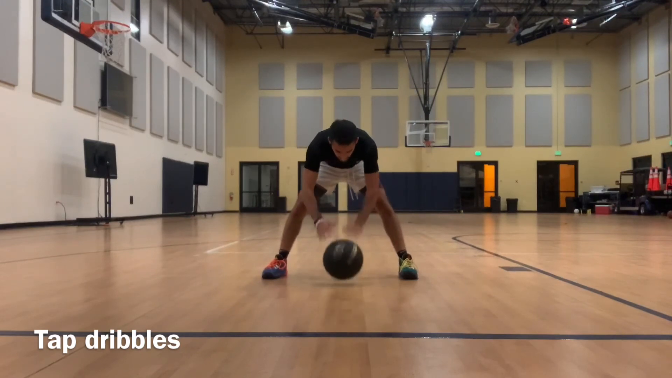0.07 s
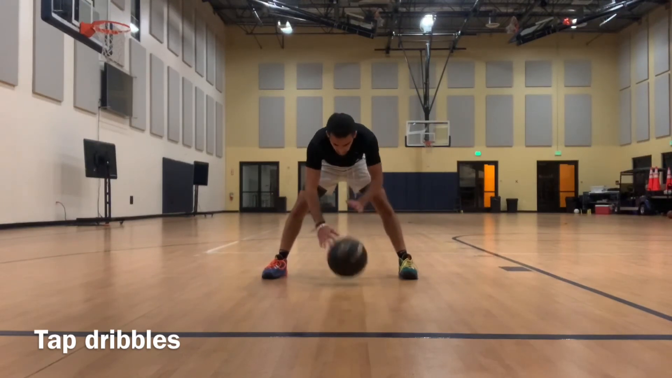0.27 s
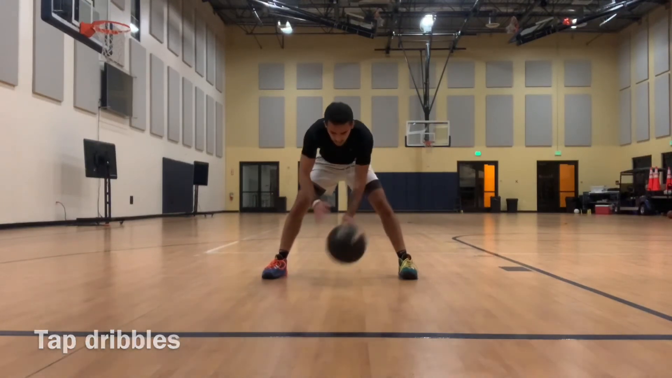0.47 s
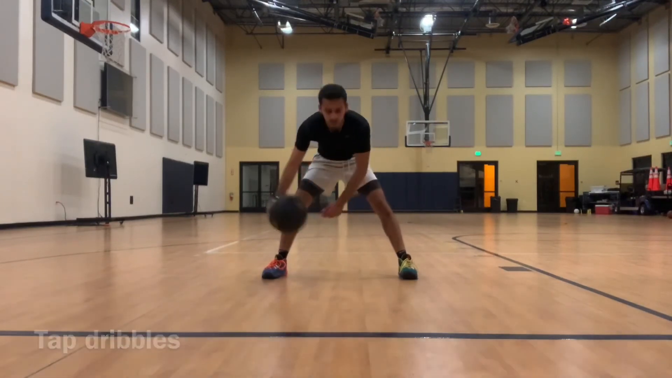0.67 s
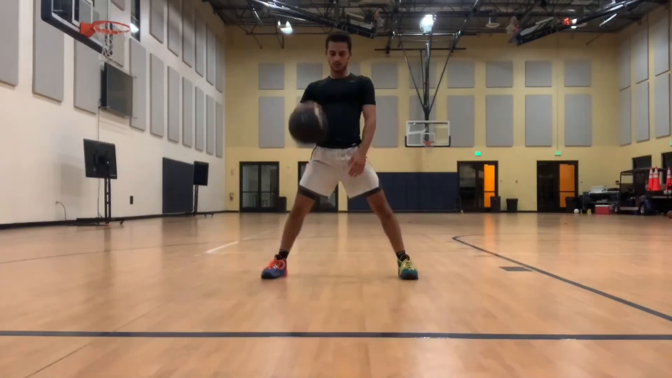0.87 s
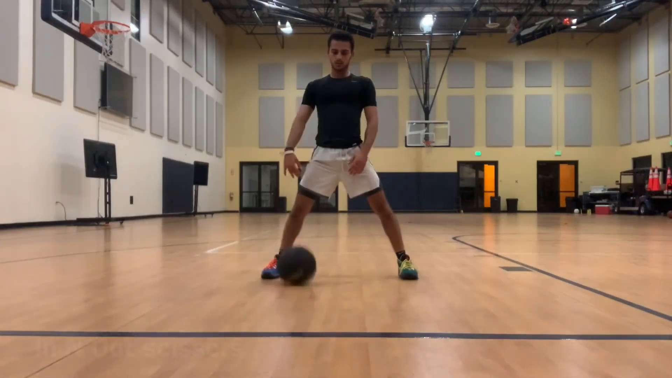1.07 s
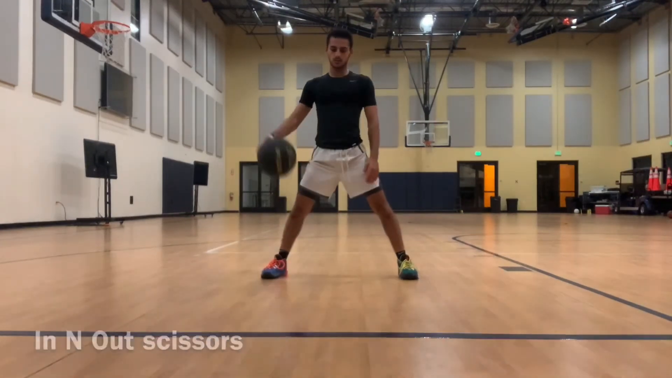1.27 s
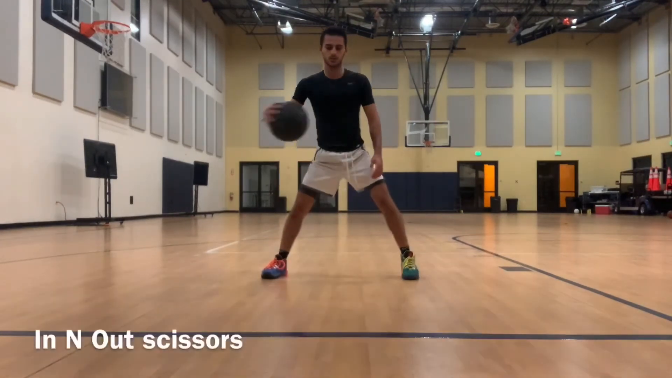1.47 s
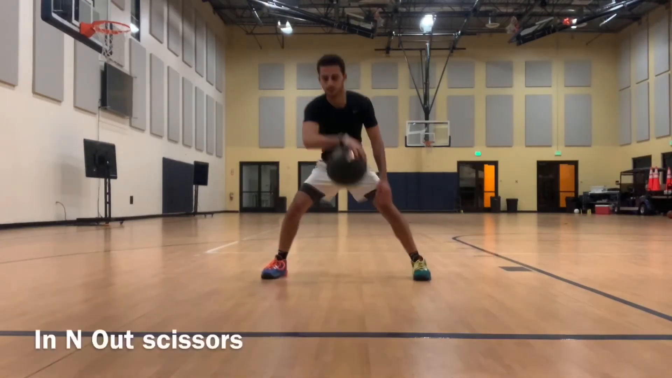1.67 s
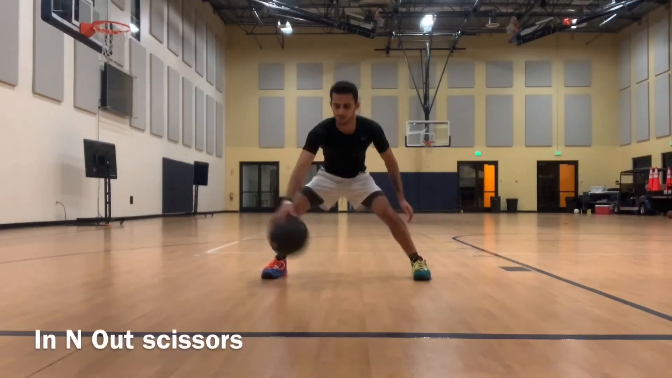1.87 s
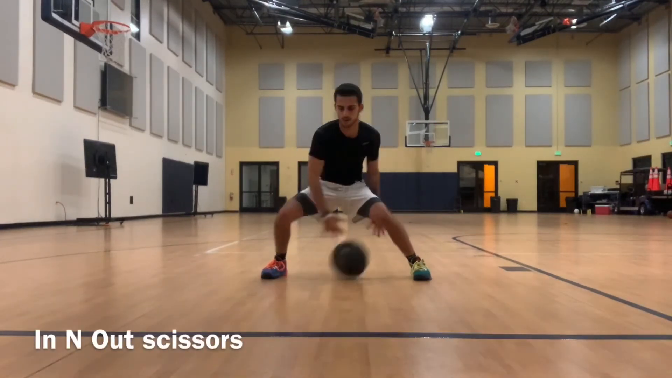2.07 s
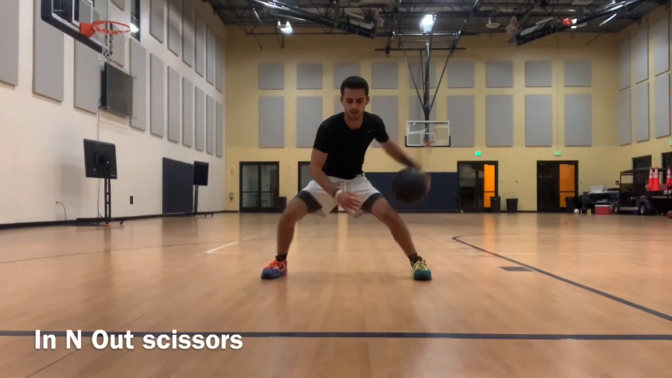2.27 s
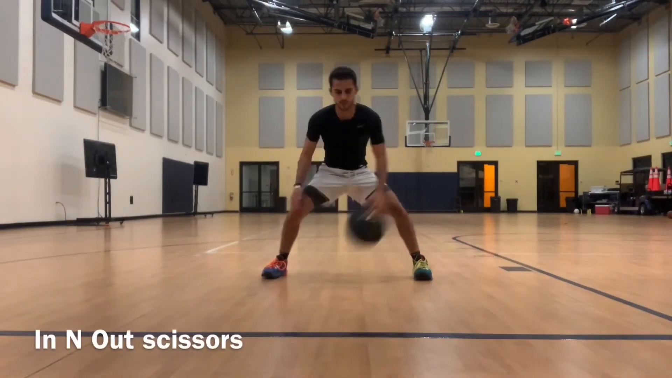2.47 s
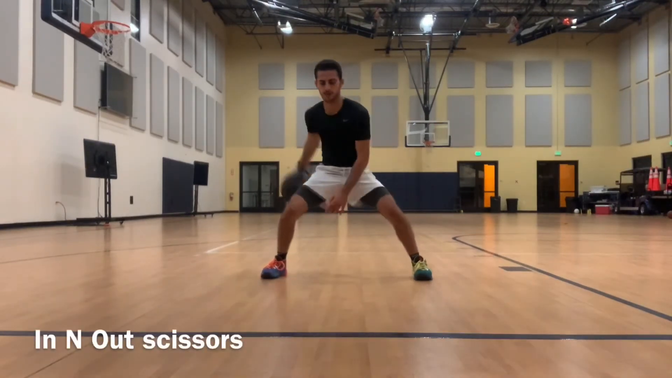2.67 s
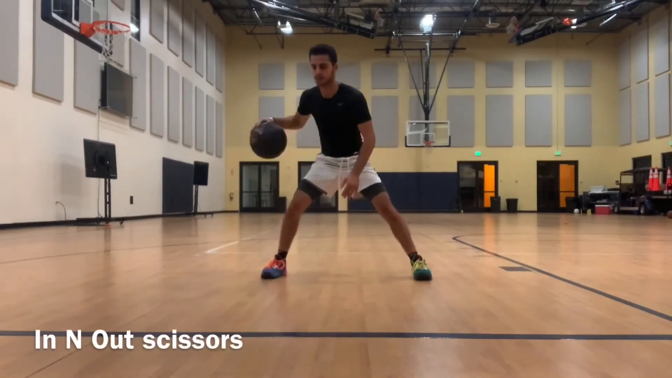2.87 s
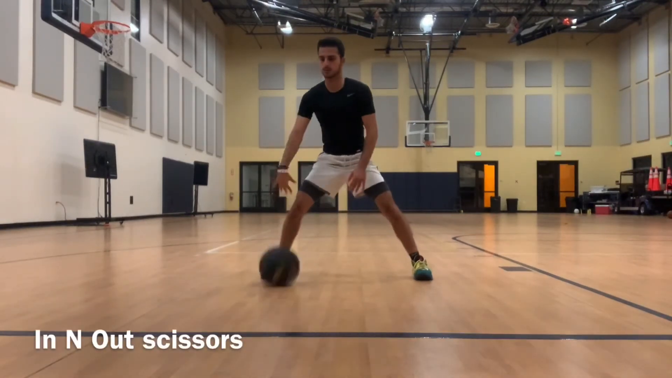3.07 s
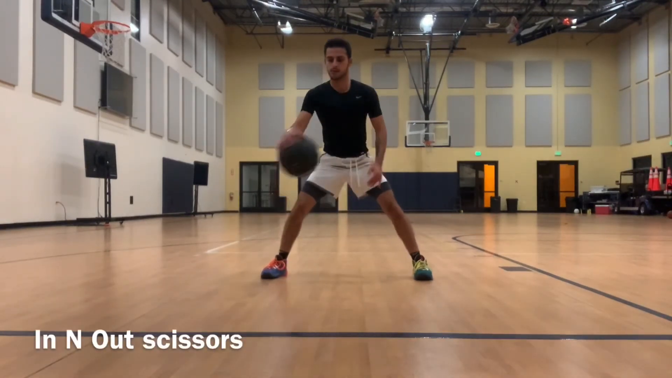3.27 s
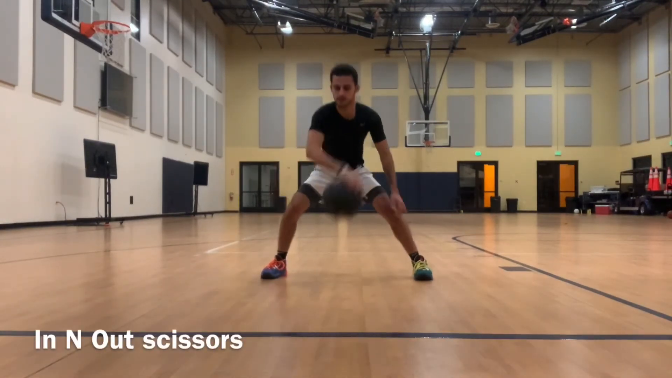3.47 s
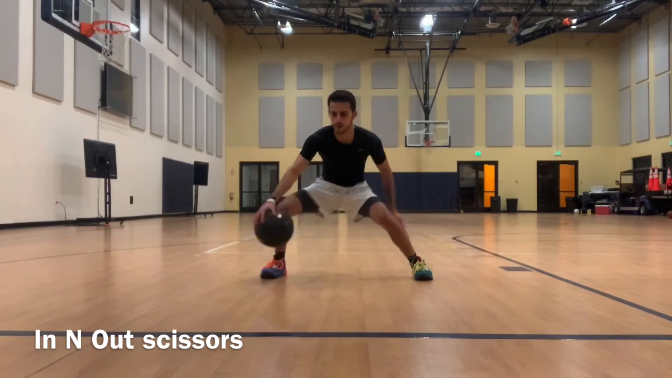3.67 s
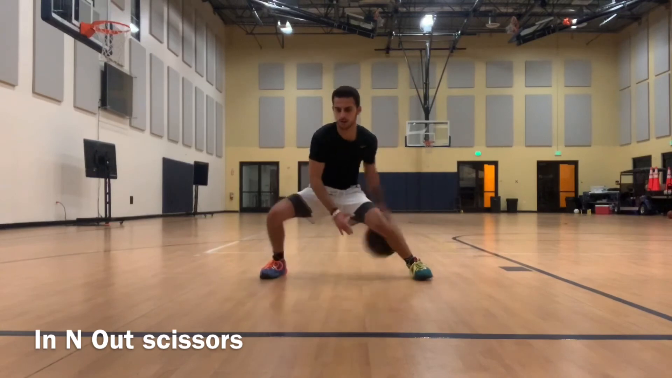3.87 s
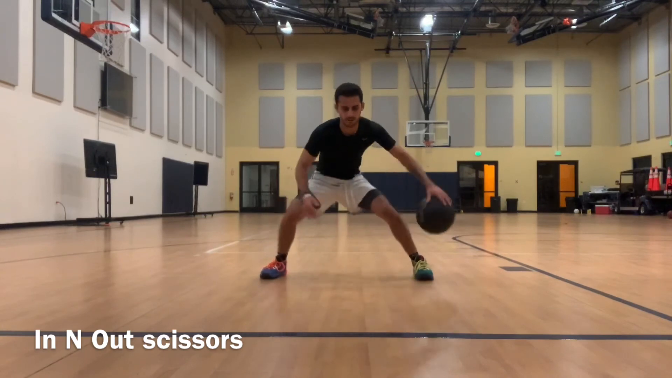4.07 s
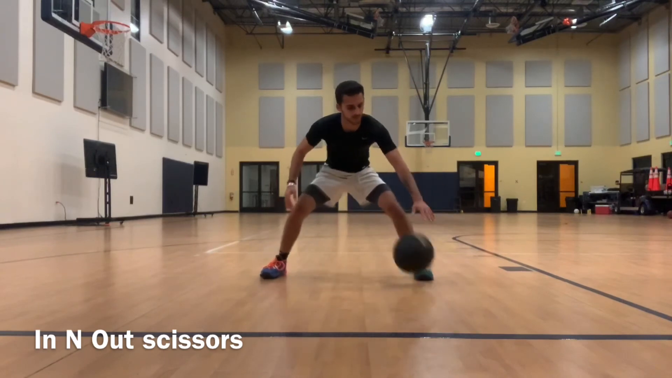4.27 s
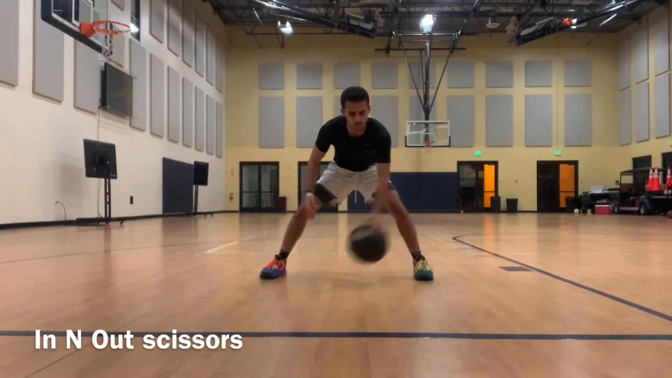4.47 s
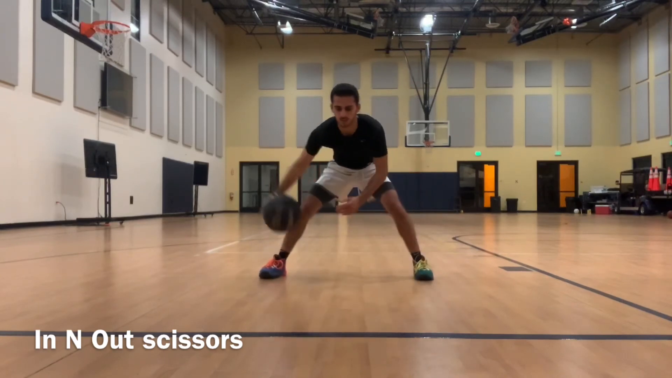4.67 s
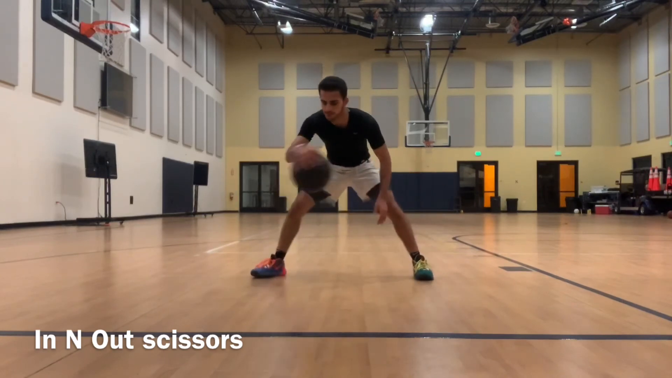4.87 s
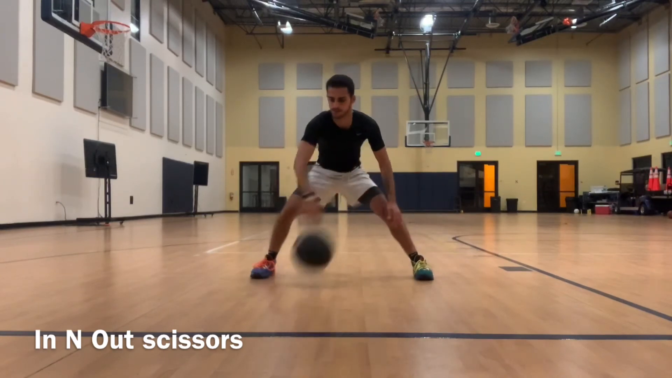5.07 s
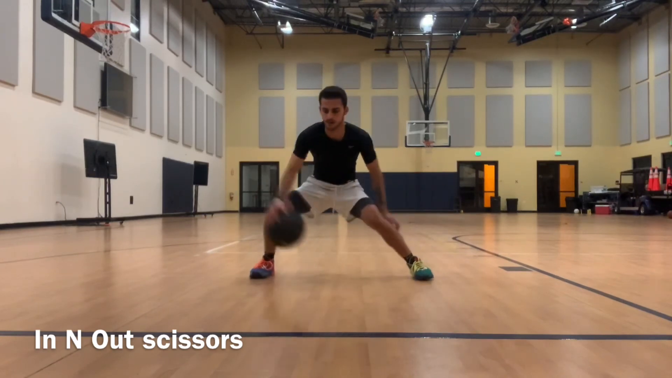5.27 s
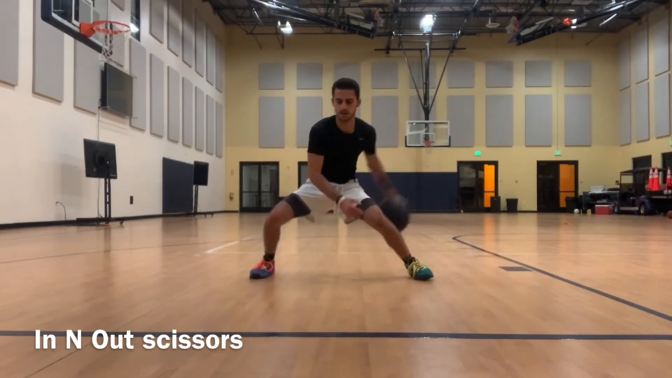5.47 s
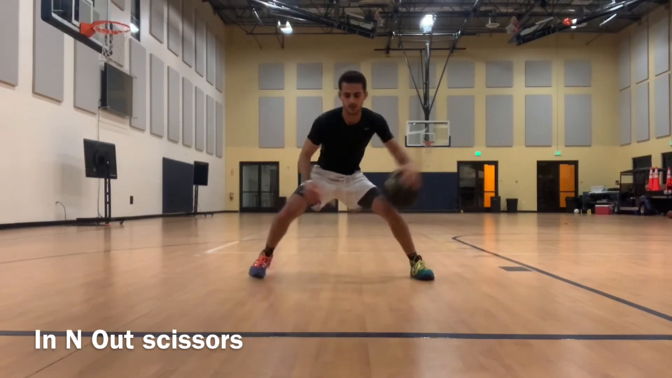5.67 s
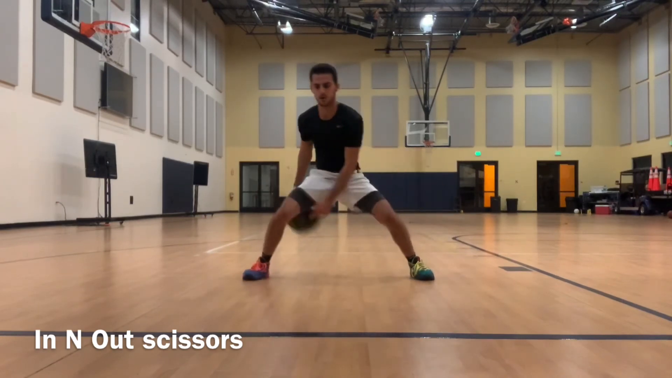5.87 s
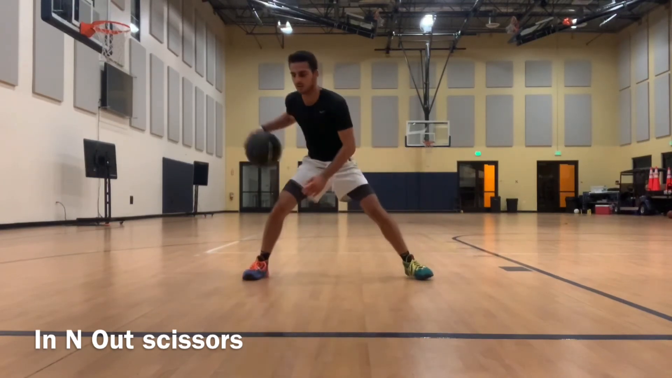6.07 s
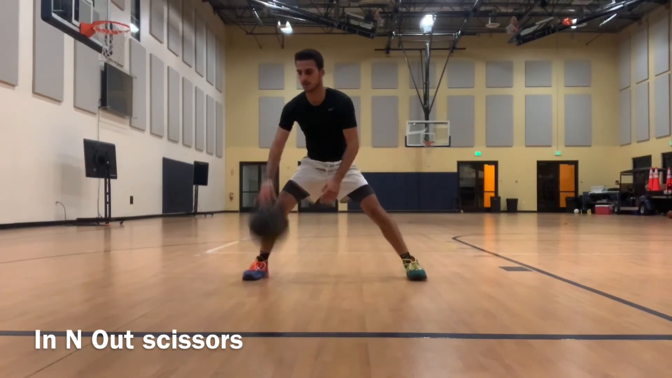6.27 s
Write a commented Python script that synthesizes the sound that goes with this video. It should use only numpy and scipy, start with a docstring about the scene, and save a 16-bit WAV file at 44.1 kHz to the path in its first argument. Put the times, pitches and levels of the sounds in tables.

```python
"""A ball is dribbled on the sprung wooden floor of a large gym, over humming ventilation and a hall still
ringing. Quick low taps come first, then one brief dip to silence, then harder bounces with soft hand touches
and late wall echoes between. Each bounce is a slap ringing the modes of the ball, a bending wave sweeping down
through the boards, some echoes and scattered returns, and a noise tail that dies band by band. Two microphone
ports give the stereo."""
import sys
import numpy as np
from scipy import signal
from scipy.fft import rfft, irfft, next_fast_len
from scipy.io import wavfile
from scipy.ndimage import uniform_filter1d

SR = 44100
rng = np.random.default_rng(int(sys.argv[2]) if len(sys.argv) > 2 else 0)


def pcm_store(signal):
    """Save signal as 16-bit PCM."""
    levels = np.round(np.clip(np.atleast_2d(signal), -1, 1) * 32767)
    wavfile.write(sys.argv[1], SR, levels.astype(np.int16).T)


N = 278260
SIZE = next_fast_len(N + 8192)  # transform length, padded
HZ = np.maximum(np.arange(SIZE // 2 + 1) * SR / SIZE, 1)  # frequency of each bin
TIME = np.arange(N) / SR
DIP_S = .802  # moment of silence

# Ball striking the floor: (time [s], slap level [dB], then over the slap: treble [dB], snap [dB], smack [dB],
# crack [dB], hollow ping [dB], body [dB], knock [dB]; ping pitch [Hz], thump over slap [dB],
# thump swell [ms], bending-wave sweep [cycles per root second], echoes over slap [dB],
# hall tail over slap [dB], then over that tail: lows [dB], mids [dB], treble [dB])
BOUNCES = [(0.0162, -24, -5.5, -11, 13, 3, 3, 4.5, -3, 1510, -4.5, 6.1, 24.6, -7, -11, 0, 2, 0),
           (0.0648, -27, -8, -3.5, -1, 1, -6, 8, 12.5, 1510, -5, 6.9, 28, -2.5, -13, 0, 6, 0),
           (0.116, -25.5, -10, -11, -3, -7, 1, -1, 5, 1430, -5, 4.6, 22.5, 3.5, 6.5, 0.38, -13, -5),
           (0.2071, -25.5, -12, -8, 2, 2.5, -8, 5.5, 4, 1510, -13, 3.1, 24.2, -3, -2, 0, 4, 9),
           (0.2773, -15, -13.5, -13, 3.5, -2.5, -6, -2, -9, 1510, -11.5, 4.5, 23.3, -1, -1.5, 0.092, -2, -9),
           (0.4294, -25.5, -7.5, -11.5, -3, -2.5, -3, 12.5, 11.5, 1510, -3, 26, 23, -7, 7.5, 0.15, 1.5, 2.5),
           (0.5008, -17.5, -3.5, -0.5, 3.5, 0.5, 9, 12, 10, 1535, -3.5, 12.4, 26, -5, 7, -0.62, -8, -7),
           (1.063, -2, -11, -5.5, 2.5, -0.5, -2, 6.5, 1, 1580, -8, 12, 23.55, -3, -1, -1.1, 1.5, -0.5),
           (1.8105, -4, -10.5, -8, 0.5, 3.5, -1, 1.5, 1, 1570, -8, 11.6, 24.1, -2.5, -1.5, 0, 1, 1),
           (2.0572, -10, -5.5, -12.5, 6, 0, 0.5, -2.5, -5.5, 1600, -9.5, 7.6, 23.9, -3, 0.5, 0.2, 0.5, 0.5),
           (2.5194, -3, -7.5, -7, -2.5, -2, 0.5, 1.5, 1.5, 1533, -12, 16, 25.15, -3, -0.5, 0, 0, 1),
           (3.0668, -1, -9, -10, 0.5, -2, -0.5, 9, 5, 1600, -7, 11, 24, -1.5, -1, 0.09, 2.5, 3),
           (3.5612, -6, -10, -2, 11, 2.5, -12, 4, 0, 1640, -6.5, 11.5, 23.36, -3.5, 1.5, -0.31, 3.5, 2.5),
           (3.798, -16, -8, -9, 5.5, -1, 5.5, 2.5, 6.5, 1470, -12.5, 8.4, 23.7, -2.5, 5.5, -0.78, -1.5, -2),
           (4.2283, -22, -4.5, -2, 9.5, -1.5, 8, 7, 9, 1370, 5.5, 8.8, 26.9, -2.5, 5, -0.18, -0.5, 0),
           (4.5198, -11, -7, -7.5, 4.5, 0.5, 3, 3.5, 1.5, 1480, -6.5, 19, 25.1, -4, -4, 1, 4.5, 2.5),
           (5.091, -7.5, -6, -3.5, 8.5, 4.5, 2, 5, 3.5, 1440, -4.5, 16, 23.3, -2, 4, -1.3, 3.5, 2.5),
           (5.3485, -11.5, -10, -7, 6.5, 0, -5, -1, -4.5, 1510, -8, 8.8, 23.6, -0.5, 3.5, -0.47, 0, -1),
           (5.7855, -11, -4, -4.5, 11.5, 3.5, 4, 4.5, 0, 1380, -2.5, 11.5, 24, -2.5, 5, 0.85, 2, 1.5)]
# Low modes of floor and hall, heard in thump, tail and air: (frequency [Hz], width [Hz], level [dB])
LOW_MODES = [(84.4, 24.4, 2), (115.5, 3.4, 4.5), (147, 10, 0), (203.3, 14, 2.5), (265.8, 8.1, 10.5),
             (333, 8, 4)]


def from_db(db):
    """The decibel is logarithmic: 20 dB is a tenfold amplitude gain."""
    return 10 ** (np.asarray(db) / 20)


def at_hz(points):
    """Interpolate (Hz, value) points along log frequency, as pitch is heard, at every bin."""
    hz, value = np.transpose(points)
    return np.interp(np.log(HZ), np.log(np.maximum(hz, 1)), value)


def peaks(modes):
    """Resonance: gain at every bin from bumps on the decibel scale, given as (Hz, width Hz, dB)."""
    bumps_db = (gain_db / (1 + (2 * (HZ - hz) / width) ** 2) for hz, width, gain_db in modes)
    return from_db(sum(bumps_db))


def clicks(times, gains):
    """Impulses: one sample of the given height at each time."""
    out = np.full(N, 1e-18)
    out[np.clip(np.round(times * SR).astype(int), 0, N - 1)] = gains
    return out


def drift(rate_hz):
    """Low-passed noise: a slow random wander of standard deviation 1."""
    pole = np.exp(-2 * np.pi * rate_hz / SR)
    slow = signal.lfilter([1], [1, -2 * pole, pole ** 2], rng.standard_normal(N + SR))[SR:]
    return slow / slow.std()


def diffuse(spectrum):
    """Diffuse-field coherence: left and right noise spectra, alike by frequency, of rms 1 over both."""
    # Likeness of the ports: (frequency [Hz], correlation before clipping to -1..1 [ratio])
    likeness = [(60, 1), (300, 0.85), (700, 0.28), (1200, -0.59), (1800, 0.2), (4000, -0.1), (6000, 0.16),
                (7100, -0.86), (8800, -1.14), (9900, 0.43), (11000, 1), (13200, 0.96), (14200, -0.53)]
    mid, side = rfft(rng.standard_normal((2, SIZE))) * from_db(at_hz(spectrum))
    alike = np.clip(at_hz(likeness), -1, 1)
    pair = np.sqrt(1 + alike) * mid + np.sqrt(1 - alike) * side * [[1], [-1]]
    return pair / irfft(pair, SIZE).std()


def ventilation():
    """Broadband flow noise coloured by low resonances, and a motor hum with a faint octave harmonic."""
    # Air noise: (frequency [Hz], relative level per hertz [dB])
    air = [(30, -20), (48, -14.5), (70, 0.5), (110, -12.5), (160, -16), (230, -37.5), (420, -32.5),
           (700, -40.5), (1000, -52), (1300, -49), (3600, -55.5), (7000, -62.5), (12000, -69.5),
           (14500, -68.5), (16000, -105)]
    # Swelling and sinking of the hum fundamental: (time [s], rms level [dB])
    hum_swell = [(0, -32), (.55, -25), (1.3, -36), (2.0, -30.5), (2.4, -25.5), (3.2, -28), (3.75, -33.5),
                 (4.6, -28.5), (5.2, -27), (5.8, -33), (6.3, -25)]
    air_db = -30  # before the low modes colour it
    hum_hz, wander_hz, octave_db = 58.37, 1.0, -17.5
    phase = 2 * np.pi * np.cumsum(hum_hz + wander_hz * drift(2.83)) / SR
    tone = np.sin(phase) + from_db(octave_db) * np.sin(2 * phase)
    hum = np.sqrt(2) * from_db(np.interp(TIME, *np.transpose(hum_swell))) * tone
    rush = irfft(diffuse(air) * peaks(LOW_MODES), SIZE)[:, :N]
    return from_db(air_db) * rush + hum


def hall():
    """Reverberation as energy balance: bounces feed power that builds up, then decays band by band."""
    # Tail noise: (frequency [Hz], relative level per hertz [dB])
    tail = [(35, -16), (55, -2), (80, -1.5), (130, -7), (250, -19), (650, -23.5), (950, -31.5), (1300, -33),
            (1700, -35), (3500, -41), (6500, -44.5), (10000, -48.5), (13500, -50), (15000, -64),
            (17000, -95)]
    # Reverberation time: (frequency [Hz], time to fall 60 dB [s])
    hall_t60 = [(60, 1.2), (160, 1.83), (420, 0.96), (1100, 1.294), (2300, 1.1), (3500, 1.85), (7000, 1.2),
                (13000, 0.7)]
    # Long ringing of the air in the ball, carried by the tail: (frequency [Hz], width [Hz], level [dB])
    ring = [(456, 50, 3), (710, 8.2, -2.5), (1322, 180, 13), (2195, 47, 11), (2880, 170, 1.5),
            (3380, 470, 5)]
    earlier_taps_db = -38.5  # feeds the tail still ringing at the start
    common_db, rise_s = -22, .011
    ping_feed, body_feed = .097, .18  # dB of tail per dB of ping, and per dB of body over knock
    ragged_db, ragged_hz = 2.5, 45  # the hall favours some pitches over their neighbours
    grain_db = 1.7  # late echoes make the tail uneven

    (s, slap_db, _, _, _, _, ping_db, body_db, knock_db, *_,
     tail_db, low_db, mid_db, treble_db) = np.transpose(BOUNCES)
    width = round(ragged_hz / HZ[1] / 2)
    ragged = uniform_filter1d(rng.standard_normal(len(HZ)), size=width)
    ragged = uniform_filter1d(ragged, size=width)
    noise = diffuse(tail) * peaks(LOW_MODES + ring) * from_db(ragged_db * ragged / ragged.std())

    lean_edges_hz = [100, 560, 1100, 1900, 5000]
    body_lean_db = low_db + body_feed * (body_db - knock_db)
    leans_db = [0, low_db, body_lean_db, ping_feed * ping_db, mid_db, treble_db]
    bands = np.geomspace(60, 13000, 20)
    t60_hz, t60_s = np.transpose(hall_t60)
    rise = np.exp(-1 / (rise_s * SR))
    before_dip = TIME < DIP_S
    out, together = 0, drift(28.0)
    for hz, t60 in zip(bands, np.interp(np.log(bands), np.log(t60_hz), t60_s)):
        lean_db = leans_db[np.searchsorted(lean_edges_hz, hz, side="right")]
        # Doubled decibels turn the amplitude gain into power
        fed = clicks(s, from_db(2 * (slap_db + tail_db + common_db + lean_db)))
        fed[0] = from_db(2 * earlier_taps_db)
        fed = [fed * before_dip, fed * ~before_dip]
        fed = signal.lfilter([(1 - rise) ** 2], [1, -2 * rise, rise ** 2], fed)
        early, late = signal.lfilter([1], [1, -from_db(-120 / (t60 * SR))], fed)
        power = early * before_dip + late  # the dip ends the early tails
        share = at_hz([(other, float(other == hz)) for other in bands])  # overlapping triangles
        grain = from_db(grain_db * (0.5 * together + drift(22.0)))
        out = out + grain * np.sqrt(power) * irfft(noise * share, SIZE)[:, :N]
    return out


def skin(times, level_db, colours_db, ping_hz, length_ms, grit_db, spread_db):
    """Modal excitation: each contact, a click and a rough burst, rings the ball's damped modes."""
    # level before colour and spread [dB], time to fall 60 dB [ms])
    ball = [(150, -27, 3.6), (415, -9.5, 12.7), (543, -5, 20.6), (559, -0.5, 13.3), (639, 0, 7.9),
            (790, -5, 7.4), (864, -20, 37.5), (None, -9, 11), (2330, -3, 1.52), (2930, -3, 2.04),
            (3850, -7.5, 5.7), (5284, -9, 10.5), (6780, -8.5, 9.3), (8720, -0.0023, 4.8), (12000, 5.3, 1)]
    colour_edges_hz = [560, 1100, 1900, 3100, 4500, 7500]
    detune_spread = .03  # fraction of the mode's pitch
    chance = rng.standard_normal((len(times), 2, len(ball)))
    grit = rng.standard_normal((len(times), 1500))
    age_ms = np.arange(1500) / SR * 1000
    out = np.zeros(N + SR)
    contacts = zip(times, level_db, np.transpose(colours_db), ping_hz, length_ms, chance, grit)
    for s, db, colours, pitch, ms, (own, detune), rough in contacts:
        treble, snap, smack, crack, ping, body, knock = colours
        rising_db = [knock, body, ping, smack, crack, snap, treble]  # by rising frequency
        force = from_db(grit_db) * rough * np.exp(-age_ms / max(ms, .1))
        force[0] = -1
        start = round(s * SR)
        for k, (hz, mode_db, t60_ms) in enumerate(ball):
            hz = hz or pitch
            radius = from_db(-60000 / (t60_ms * SR))
            turn = 2 * np.pi * hz / SR * (1 + detune_spread * detune[k])  # radians per sample
            colour_db = rising_db[np.searchsorted(colour_edges_hz, hz, side="right")]
            sign = (-1) ** (k + (hz > 1100))
            gain = sign * from_db(db + mode_db + spread_db * own[k] + colour_db)
            poles = [1, -2 * radius * np.cos(turn), radius ** 2]
            out[start:][:1500] += gain * signal.lfilter([np.sin(turn)], poles, force)
    return out[:N]


def slaps():
    """Impact and reflection: the floor slap, then smeared, band-limited returns from the hall's surfaces."""
    # Reflecting surfaces: (level [dB], smear [ms], low edge [Hz], high edge [Hz])
    echoes = [(-8, 2.63, 120, 7500), (-6, 3.7, 490, 810), (-11, 3.4, 100, 5600), (-15, 2.9, 1200, 10000),
              (-24, 12, 68, 1200), (-39.5, 2.2, 380, 12000), (-35, 3.1, 640, 20000), (-33, 6.9, 450, 2900),
              (-30.5, 7.3, 510, 1200)]
    # Their delays in the same order: (delay [s])
    echo_delays = [.0027, .0075, .0135, .0263, .043, .063, .086, .105, .186]
    s, db, *colours_db, ping_hz, _, _, _, echo_db, _, _, _, _ = np.transpose(BOUNCES)
    burst_ms = np.full(len(s), 1.2)
    out = skin(s, db, colours_db, ping_hz, burst_ms, grit_db=-21, spread_db=1.0)
    for delay, (surface_db, smear_ms, low_hz, high_hz) in zip(echo_delays, echoes):
        back = skin(s + delay, db + echo_db + surface_db, colours_db, ping_hz,
                    np.full(len(s), smear_ms), grit_db=-17, spread_db=1.5)
        band = signal.butter(1, [low_hz, high_hz], "band", fs=SR, output="sos")
        out += signal.sosfilt(band, back)
    return out


def boards():
    """Dispersion: high bending waves outrun low ones, so each thump sweeps down; low modes ring on."""
    lag_s = .00011  # the bending wave sets off just after the slap
    low_ring_db = -1  # added to every low mode
    age = np.arange(5000) / SR
    out = np.zeros(N + 5000)
    for s, db, *_, thump_db, ms, sweep, _, _, _, _, _ in BOUNCES:
        swell = age * 1000 / ms
        envelope = swell * np.exp(1 - swell ** 1.4)
        wave = envelope * np.sin(2 * np.pi * sweep * np.sqrt(age))
        out[round((s + lag_s) * SR):][:5000] += from_db(db + thump_db) * wave
    thump = out[:N] + 1e-18
    ringing = 0
    for hz, width, gain_db in LOW_MODES:
        resonator = signal.iirpeak(hz, hz / width, fs=SR)
        ringing = ringing + from_db(gain_db + low_ring_db) * signal.lfilter(*resonator, thump)
    return thump + ringing


def scatter(slap):
    """Scattering: beams, panels and stands send forty weak band-wide returns, alike for every bounce."""
    first_s, last_s = .03, .32
    low_hz, high_hz = 350, 6000
    level_db, fall_db_per_s = -17, -40
    out = np.zeros((2, N))
    for late, high, strength, side in rng.random((40, 4)):
        delay = first_s + late * (last_s - first_s)
        hz = low_hz * (high_hz / low_hz) ** high
        band = signal.butter(2, [hz / 1.25, hz * 1.25], "band", fs=SR, output="sos")
        back = signal.sosfilt(band, slap + 1e-18)
        pan_db = 6 * (side - .5) * np.array([[1], [-1]])
        gain = from_db(level_db + fall_db_per_s * delay - 8 * strength + pan_db)
        lag = round(delay * SR)
        out[:, lag:] += gain * back[:N - lag]
    return out


def soft_contacts():
    """Soft contact: hand touches and faint late wall echoes excite the same ball modes with a rough burst of
    varying length."""
    # Soft sounds on the ball, hand touches and some late wall echoes of bounces: (time [s], level [dB], treble
    # [dB], mids [dB], knock [dB], # burst decay [ms])
    soft_sounds = [(1.499, -59, 2.5, 7, 7, 13), (1.5694, -47, -12, -3, 0, 17), (1.879, -49, 2, 0, 1, 4),
                   (2.42, -63, 1.5, -2, 0, 43), (4.139, -45.5, -8, 3, 6, 16), (4.372, -55, 6, 0, -11, 4),
                   (4.39, -41, -5.5, -7, 9, 10.6), (5.723, -46, -21, -6, -4, 3.3),
                   (5.732, -29, -21, -2, 4.5, 2.2), (5.877, -26, -21, -7, -10, 13), (6.149, -52, -11, 0, 2, 30)]
    s, db, treble_db, mids_db, knock_db, length_ms = np.transpose(soft_sounds)
    smack_db, crack_db, ping_db = mids_db - 3, mids_db - 3, mids_db - 7
    colours_db = [treble_db, treble_db, smack_db, crack_db, ping_db, knock_db, knock_db]
    ping_hz = np.full(len(s), 1510)
    return skin(s, db, colours_db, ping_hz, length_ms, grit_db=-14.0, spread_db=3.5)


def scene():
    """Superposition: near sound meets the ports with a phase step; hall and air noise are diffuse."""
    # Phase step between the ports for near sound: (frequency [Hz], left lead [rad])
    lead = [(0, 0), (300, -.4), (1100, -2.1), (1400, -5.9), (2200, -7), (2400, -6.2), (4200, -6.8),
            (4700, -7.2), (5200, -11), (6000, -13.4), (7000, -15.2), (8800, -15.4), (11000, -13.1),
            (13600, -11.6), (15200, -9.8)]
    slap = slaps()
    near = slap + scatter(slap) + soft_contacts() + boards()
    ports = np.exp(.5j * np.interp(HZ, *np.transpose(lead)) * [[1], [-1]])
    return irfft(rfft(near, SIZE) * ports, SIZE)[:, :N] + hall() + ventilation()


def record(dry):
    """Transducer response: port balance, bass loss, soft limiting and a treble cutoff; the level also dips once
    to silence."""
    # Level difference of the ports: (frequency [Hz], left over right [dB])
    balance = [(60, 4), (110, 1), (200, 5.5), (380, 3.5), (700, 0.5), (1290, 1), (2380, -3.5), (4400, -1.5),
               (8120, 1.5), (15000, -0.5)]
    dip_out_s, dip_in_s = .022, .04
    low_hz, cutoff_hz, ceiling = 40.7, 16543, .95
    wet = irfft(rfft(dry, SIZE) * from_db(at_hz(balance) * [[.5], [-.5]]), SIZE)[:, :N]
    wet = signal.sosfilt(signal.butter(3, low_hz, "high", fs=SR, output="sos"), wet)
    wet = wet * np.interp(TIME, [DIP_S - dip_out_s, DIP_S, DIP_S + dip_in_s], [1, 0, 1])
    wet = wet / (1 + (np.abs(wet) / ceiling) ** 6) ** (1 / 6)  # peaks round off
    return signal.sosfilt(signal.cheby2(12, 70, cutoff_hz, fs=SR, output="sos"), wet)


dry = scene()
out = record(dry)
pcm_store(out)
```